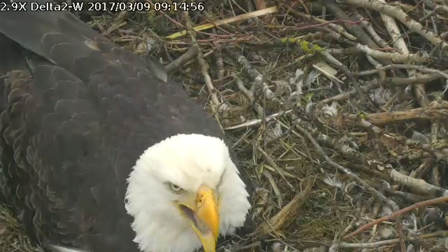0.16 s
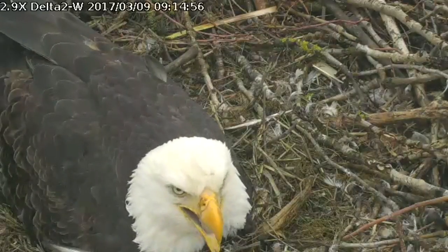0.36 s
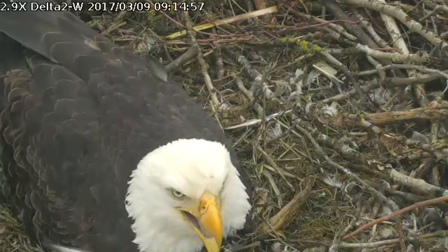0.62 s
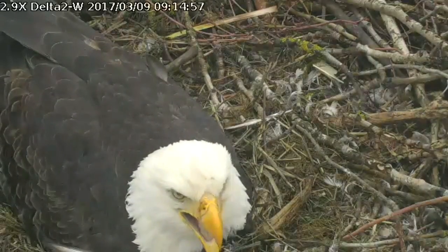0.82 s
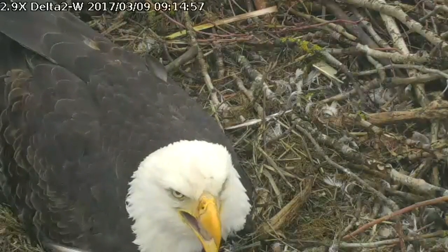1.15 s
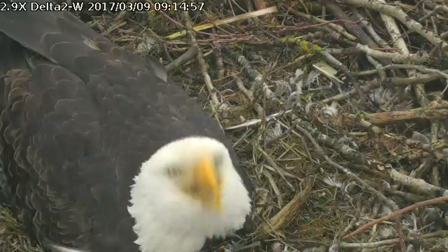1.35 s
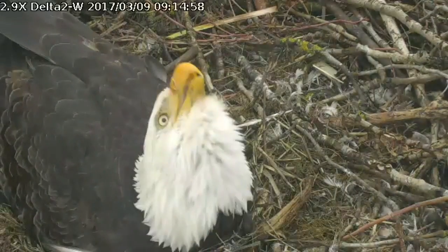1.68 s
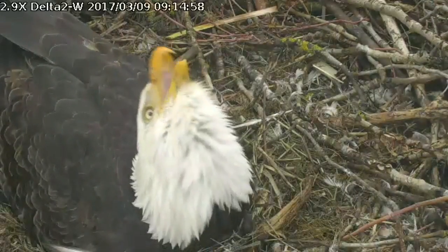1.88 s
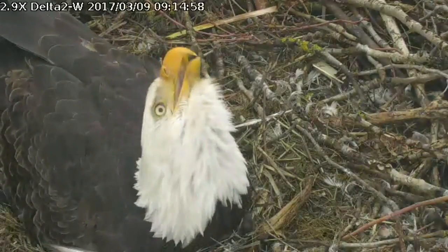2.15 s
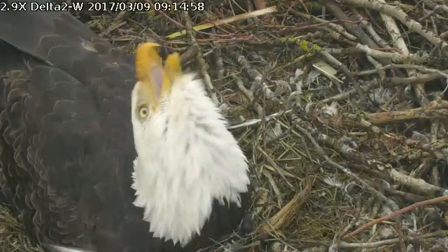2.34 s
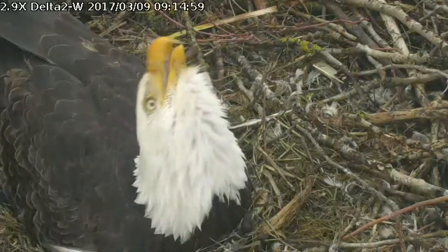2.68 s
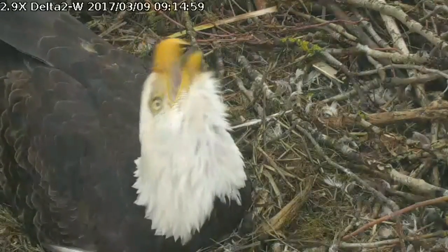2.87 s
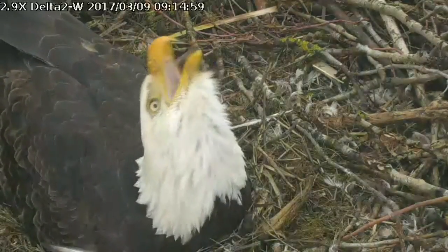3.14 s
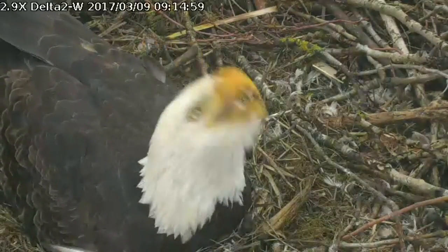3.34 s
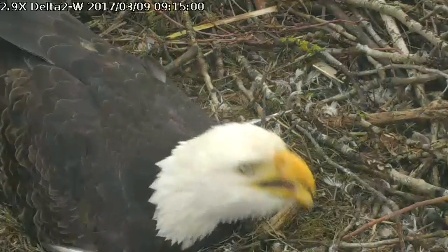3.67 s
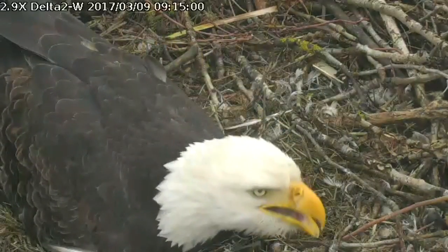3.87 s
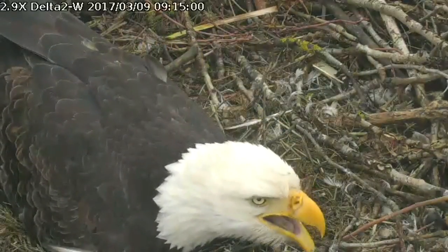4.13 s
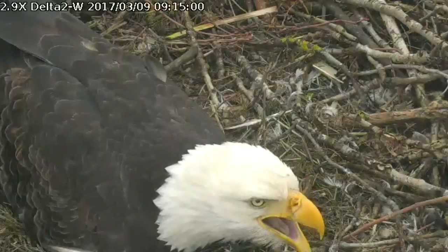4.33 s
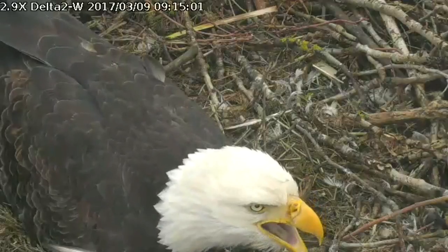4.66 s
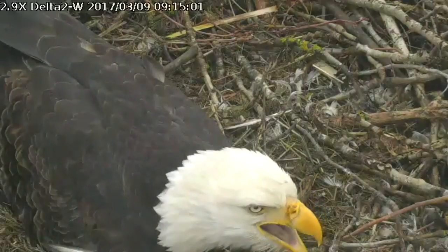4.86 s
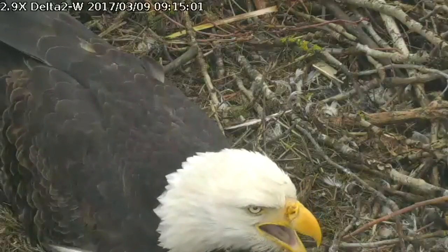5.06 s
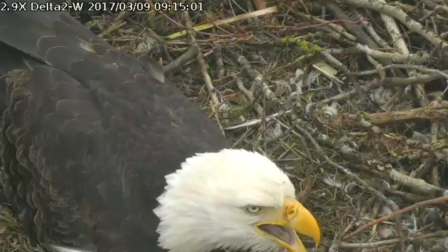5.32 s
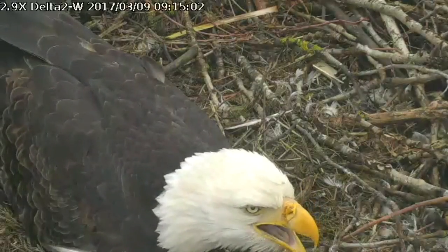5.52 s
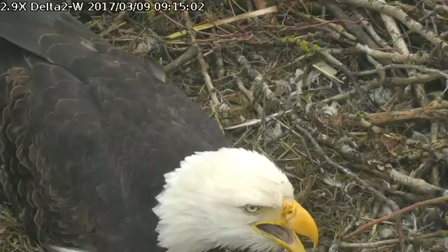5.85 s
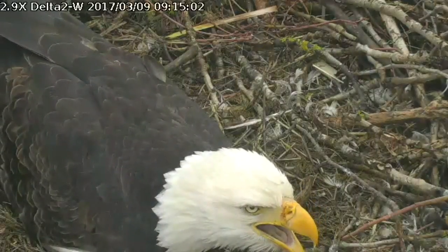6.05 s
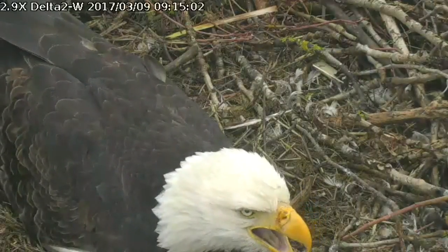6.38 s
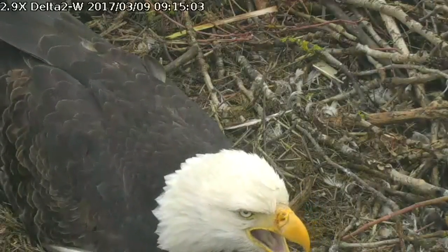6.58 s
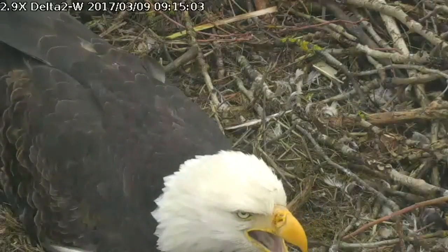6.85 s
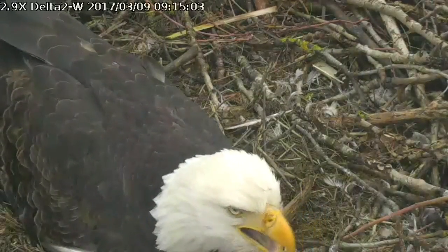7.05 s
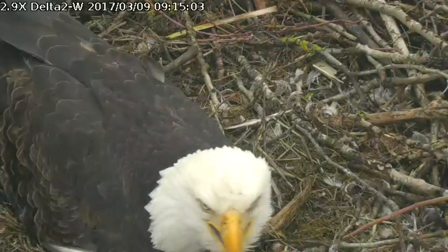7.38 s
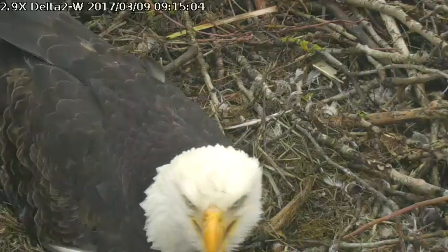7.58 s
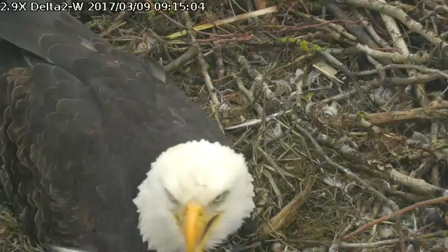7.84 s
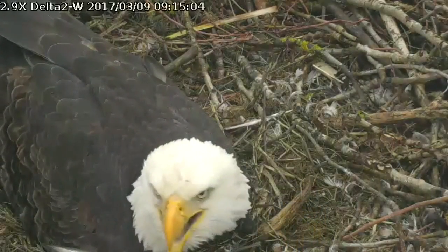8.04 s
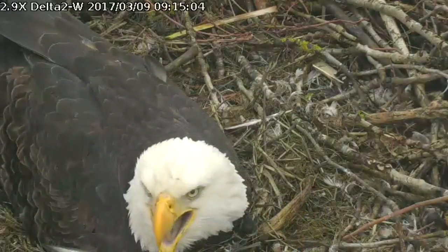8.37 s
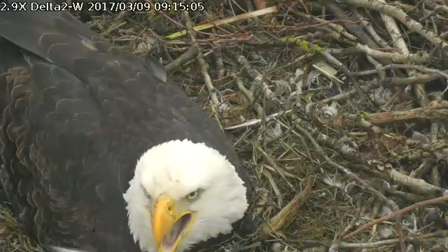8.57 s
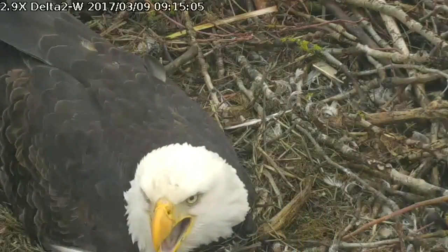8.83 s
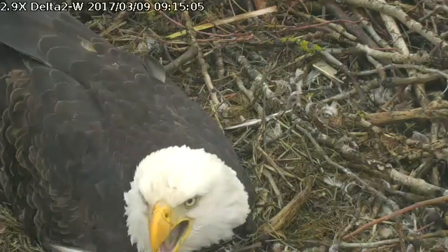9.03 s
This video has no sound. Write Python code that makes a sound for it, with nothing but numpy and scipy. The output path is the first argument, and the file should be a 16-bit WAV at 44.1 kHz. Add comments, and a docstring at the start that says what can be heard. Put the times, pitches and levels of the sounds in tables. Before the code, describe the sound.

Close to the nest microphone, a bald eagle gives five thin, high squeals, evenly spaced, each breaking into a hoarse, creaking rasp. A quick run of sharp chirps follows, with soft, dull bumps in the nest. After a pause comes a quieter run, and after another the loudest one. A steady low electrical hum, outdoor hiss and a faint distant drone lie underneath throughout.

```python
"""A mains hum on a nest camera's microphone line sits over outdoor hiss and a far drone.
Close by, a bald eagle gives five thin, arching squeals; each breaks into a rasp and a hoarse,
creaking note with a short cry and a few snaps. Three runs of sharp chirps follow, the first with
soft bumps in the nest; croaks lead into some calls. A chirp is a fall in which two voices beat,
then two clean whistles, high and low, from the two sides of the syrinx."""
import sys
import numpy as np
from scipy import signal
from scipy.fft import rfft, irfft, next_fast_len
from scipy.io import wavfile

SR = 44100
rng = np.random.default_rng(int(sys.argv[2]) if len(sys.argv) > 2 else 0)


def store_pcm(level_fs):
    """Save levels as 16-bit WAV."""
    pcm = np.round(np.clip(level_fs, -1, 1) * 32767).astype(np.int16)
    wavfile.write(sys.argv[1], SR, np.atleast_2d(pcm).T)


N = 406155
SIZE = next_fast_len(N, real=True)
TIME, BINS = np.arange(N) / SR, np.fft.rfftfreq(SIZE, 1 / SR)
MAINS_HZ, TREBLE_EDGE_HZ = 60, 7000

# odd harmonics of the hum: harmonic_number, level_db
HUM_HARMONICS = [(1, -34), (3, -42.5), (5, -53), (7, -56.5), (9, -65), (11, -59.5), (13, -63.5),
                 (15, -64.5)]
# outdoor hiss as the microphone colours it: frequency_hz, relative_db
HISS_COLOUR = [(30, 10), (66, 9.5), (98, 0.5), (128, -5.5), (200, -1.5), (350, -4), (560, -1.5),
               (740, -4.5), (1120, -2.5), (1850, -7.5), (2700, -9.5), (3080, -2.3), (3550, -13.3),
               (4300, -22.5), (7000, -35.5)]
# resonances of the far drone: centre_hz, width_hz, relative_db
DRONE_RESONANCES = [(600, 140, -8), (860, 75, -3)]
# the drone's slow fade: time_s, level_db
DRONE_FADE = [(0, -49), (3.5, -48), (4.6, -50), (9.2, -59.5)]
# squeals and their breaks: start_s, break_s, leap_hz, arch_height_hz, break_hz,
# leap_db, arch_db, break_db, rasp_db, cry_db, creak_db
SQUEAL_CUES = [(0.736, 0.799, 4640, 1136, 5970, -33, -38, -25.5, -28, -22.5, -30.5),
               (1.179, 1.247, 5650, 1320, 5750, -36, -43.5, -26.5, -29.5, -18.5, -31),
               (1.619, 1.653, 6020, 619, 5900, -33, -41, -28.5, -29, -41, -30),
               (2.028, 2.054, 6180, 604, 5850, -31, -42, -28.5, -29, -31.5, -36),
               (2.432, 2.482, 6245, 399, 6150, -33, -37.5, -26, -27.5, -22.5, -33)]
# resonances of the rasping throat: centre_hz, width_hz, relative_db
THROAT_RESONANCES = [(153, 110, 1.5), (1220, 600, -8), (2010, 180, -9), (3170, 620, -2.5), (4500, 500, -11),
                     (6700, 1600, -11)]
# snaps of the slack syrinx: centre_s, pitch_hz, level_db
SNAP_CUES = [(0.852, 1680, -33.5), (1.2882, 1900, -29.5), (1.302, 2330, -29), (1.3145, 1930, -33),
             (1.6947, 2400, -27.5), (1.710, 2700, -28), (2.096, 2260, -29), (2.109, 1920, -31.5),
             (2.524, 1980, -27.5), (2.54, 2160, -31.5)]
# croaks before a call: start_s, length_s, first_pulse_hz, last_pulse_hz, level_db, throat_tuning_ratio
CROAK_CUES = [(1.57, 0.067, 645, 685, -39.5, 0.89), (1.985, 0.032, 695, 720, -27.5, 0.94),
              (2, 0.033, 673, 730, -31, 0.94), (2.391, 0.04, 560, 696, -29, 0.93),
              (7.970, 0.04, 690, 723, -32.5, 1.08)]
# the throat during a croak: frequency_hz, relative_db
CROAK_THROAT = [(1400, -25), (2200, -12.5), (2850, -5), (3500, 5.5), (4300, -5.5), (5000, -29.5),
                (5800, -30)]
# bumps through the nest as the bird throws its head forward: peak_s, half_width_s, level_db
BUMP_CUES = [(3.676, 0.3, -31), (3.983, 0.038, -35)]
# slurs into a chirp: start_s, length_s, first_hz, top_hz, last_hz, full_level_db, roughness
SLUR_CUES = [(3.646, 0.0128, 3870, 5080, 4700, -21, 0.25), (8.0506, 0.016, 4060, 5330, 4200, -21, 0.2)]
# chirps: start_s, fall_s, from_hz, to_hz, fall_db, beat_hz, high_hz, high_db, high_half_length_s,
# low_hz, low_db, low_delay_s, low_fade_s, low_sag_hz_per_s, whistle_roughness
CHIRP_CUES = [(3.657, .0138, 4640, 3700, -23, 370, 4930, -18.5, 0.004, 3470, -22, .0095, 0.0087, 3000, 0.4),
              (3.781, 0.0125, 4450, 3900, -20, 480, 4780, -35, 0.014, 3850, -25, 0.0145, 0.011, 39500, 0.4),
              (3.9178, 0.0089, 3460, 3000, -23, 457, 4120, -49, 0.024, 2870, -31.5, 0.0081, 0.01, 11850, .45),
              (5.724, 0.0125, 3830, 3030, -23, 470, 4770, -37, 0.0092, 3090, -37, .006, 0.0062, 8050, 0.4),
              (5.846, 0.0095, 3900, 3165, -24, 570, 4670, -32, 0.011, 2890, -35.5, 0.009, 0.01, 4040, 0.46),
              (5.979, 0.0072, 3470, 2920, -24.5, 466, 4070, -42, 0.0084, 2930, -40.5, 0.0087, .008, 8000, 0.6),
              (8.063, 0.011, 4550, 3430, -19, 512, 5050, -13, 0.010, 3394, -14.5, 0.013, 0.007, 2630, 0.17),
              (8.177, 0.0098, 4630, 3340, -19.5, 480, 4990, -16.5, 0.008, 3358, -6.5, 0.013, 0.0089, 2660, 0.22),
              (8.3044, 0.01, 4360, 3300, -18.5, 523, 4690, -17, 0.0096, 3310, -18, 0.010, 0.005, 2520, 0.19),
              (8.443, 0.01, 3850, 3130, -22.5, 600, 4300, -26.5, 0.013, 2600, -30, 0.014, 0.0045, 5000, 0)]
# peeps, alone or beside a call: peak_s, half_length_s, pitch_hz, level_db, roughness
PEEP_CUES = [(2.399, .014, 4950, -41.5, 0.2), (3.696, .007, 3500, -31, 0.6), (5.720, .0055, 3810, -23, 0.2),
             (5.996, 0.0086, 4260, -40, 0.2), (6.114, .005, 3320, -46, .9), (6.131, 0.017, 3970, -38, 0.34),
             (8.1032, 0.011, 3326, -19.5, 0.3), (8.613, 0.013, 3850, -30.5, 0.42),
             (8.768, 0.011, 3714, -19.5, 0.07)]
# phase by which the left channel trails the right: frequency_hz, lag_rad
LEFT_LAG = [(60, 0.31), (300, 0.31), (800, 0.46), (1700, 0.72), (3350, 1.38), (4500, 1.77), (6900, 2.45)]


def amp(db):
    """Decibels to gain."""
    return 10 ** (np.asarray(db) / 20)


def unit(x):
    """Scales to rms 1."""
    return x / np.sqrt(np.mean(x ** 2) + 1e-20)


def over_hz(points):
    """Reads a table on a log-frequency axis at every bin."""
    hz, value = np.transpose(points)
    return np.interp(np.log(BINS + 1), np.log(hz + 1), value)


def peaks(modes):
    """Gain of a set of resonances at every bin."""
    return sum(amp(db) / (1 + 2 * ((BINS - hz) / width) ** 2) for hz, width, db in modes)


def noise(colour, grain=1):
    """Noise of rms 1, chopped by any grain, then filtered by colour."""
    return unit(irfft(rfft(grain * rng.standard_normal(N), SIZE) * colour, SIZE)[:N])


def wobble(size, rate_hz):
    """Smooth random motion of about unit size."""
    knots = rng.standard_normal(N // 20)
    return np.interp(np.arange(size) * rate_hz / SR, np.arange(len(knots)), knots)


def add(mix, start_s, sound):
    """Mixes a sound in at its cue."""
    part = mix[round(start_s * SR):][:len(sound)]
    part += sound[:len(part)]


def mains(buzz_db=-62, buzz_hz=3700, tilt=1.1, throb=0.67):
    """The line's wavering hum of odd harmonics, and a thin buzz that repeats every mains cycle."""
    hum = sum(np.sqrt(2) * amp(db) * np.cos(2 * np.pi * k * MAINS_HZ * TIME) for k, db in HUM_HARMONICS)
    size = SR // MAINS_HZ
    hz = np.fft.rfftfreq(size, 1 / SR)
    colour = np.minimum(hz / buzz_hz, (buzz_hz / (hz + 1)) ** tilt) * (hz < TREBLE_EDGE_HZ)
    cycle = irfft(colour * np.exp(2j * np.pi * rng.random(len(hz))), size)
    cycle *= 1 + throb * np.cos(2 * np.pi * 4 * np.arange(size) / size)
    return hum * (1 + 0.1 * wobble(N, rate_hz=22)) + amp(buzz_db) * unit(np.resize(cycle, N))


def outdoors(hiss_db=-40.5, rush_db=-49, rush_at_s=6.68, rush_s=0.57, rumble_db=-43.5, rumble_hz=11):
    """The bed: steady hiss, a distant rush that swells once, a deep rumble and a far drone."""
    hiss = amp(hiss_db + .3 * wobble(N, rate_hz=5)) * noise(amp(over_hz(HISS_COLOUR)))
    rush = amp(rush_db) * np.exp(-((TIME - rush_at_s) / rush_s) ** 2) * noise(peaks([(1250, 330, 0)]))
    rumble = amp(rumble_db) * noise(BINS / (1 + (BINS / rumble_hz) ** 2) ** 2)
    drone = amp(np.interp(TIME, *np.transpose(DRONE_FADE))) * noise(peaks(DRONE_RESONANCES))
    return hiss + drone + rush + rumble


def syrinx(hz, rough, jitter=0.074, shimmer=0.62, unrest_hz=1100, octave_db=-39):
    """The bird's voice: a nearly pure tone whose pitch and strength shake with roughness."""
    phase = 2 * np.pi * np.cumsum(hz * (1 + jitter * rough * wobble(len(hz), unrest_hz))) / SR
    strength = 1 + shimmer * rough * wobble(len(hz), unrest_hz)
    return np.sqrt(2) * strength * (np.sin(phase) + amp(octave_db) * np.sin(2 * phase))


def squeals(slack_hz=2940, leap_s=0.003, settle_s=0.004, swell_s=0.0032, ebb_s=0.0054, collapse_s=0.012):
    """The voice leaps from its slack pitch, arches in hoarse air, rings at the break and collapses."""
    out = np.zeros(N)
    for start_s, break_s, leap_hz, arch_hz, break_hz, leap_db, arch_db, break_db, *_ in SQUEAL_CUES:
        t = np.arange(start_s, break_s + collapse_s, 1 / SR)
        top_s = start_s + leap_s
        arch = np.sin(np.pi * np.clip((t - top_s) / (break_s - top_s), 0, 1) ** 1.3)
        collapse = np.clip((t - break_s) / collapse_s, 0, 1) ** 3
        glide = np.interp(t, [start_s, top_s, break_s], [slack_hz, leap_hz, break_hz])
        pitch = glide + arch_hz * arch + (slack_hz - break_hz) * collapse
        breaking = amp(break_db) * np.exp(-abs(t - break_s) / np.where(t < break_s, swell_s, ebb_s))
        level = amp(arch_db) + amp(leap_db) * np.exp(-((t - top_s) / settle_s - .5) ** 2) + breaking
        breath = np.sqrt(amp(arch_db) * level) * amp(1) * wobble(len(t), rate_hz=2500)
        air = breath * syrinx(pitch, rough=1, jitter=.13, shimmer=.5)
        # the other side of the syrinx adds a weak low note
        under = amp(arch_db - 3) * syrinx(hz=3050 + 300 * arch, rough=.8)
        grunt = amp(-12) * breaking * syrinx(pitch / 4, rough=1)
        tone = level * syrinx(pitch, rough=.5)
        add(out, start_s, (tone + air + under + grunt) * signal.windows.tukey(len(t), .04))
    return out


def rasps(rise_s=0.0024, early_s=0.0041, t60_s=0.27, halo_s=0.086, grain_db=2):
    """Grainy air in the throat: faint under the squeal, bursting out as it breaks."""
    level = np.zeros(N)
    for _, break_s, *_, arch_db, _, rasp_db, _, _ in SQUEAL_CUES:
        age = TIME - break_s + early_s
        burst = np.clip(age / rise_s, 0, 1) * np.exp(-np.log(1000) * np.maximum(age, 0) / t60_s)
        halo = np.exp(-(age / halo_s) ** 2)
        level += amp(rasp_db) * burst + amp(arch_db - 4) * halo
    grain = amp(grain_db * np.tanh(wobble(N, rate_hz=450)))
    return level * noise(peaks(THROAT_RESONANCES), grain)


def creaks(creak_hz=3130, pulse_hz=155, attack_s=0.003, hold_s=0.073,
           lift_hz=450, lift_at_s=.019, lift_s=0.0043, cry_at_s=0.0235, cry_s=0.0045):
    """After the break the slack syrinx stutters on a hoarse note, lifts into a cry and ends in snaps."""
    out = np.zeros(N)
    t = np.arange(0, 2 * hold_s, 1 / SR)
    for _, break_s, *_, cry_db, creak_db in SQUEAL_CUES:
        wander_hz = 130 * wobble(len(t), rate_hz=260)
        pitch = creak_hz + lift_hz * np.exp(-((t - lift_at_s) / lift_s) ** 2) + wander_hz
        pulses = np.cumsum(pulse_hz * (1 + .22 * wobble(len(t), pulse_hz))) / SR
        stutter = unit(np.sin(np.pi * pulses) ** 4 * amp(2 * wobble(len(t), pulse_hz)))
        hold = amp(creak_db) * stutter * np.minimum(t / attack_s, 1) * np.exp(-(t / hold_s) ** 6)
        cry = amp(cry_db) * np.exp(-((t - cry_at_s) / cry_s) ** 2)
        tone = syrinx(pitch, rough=1, jitter=.065, shimmer=.35, unrest_hz=1300, octave_db=-19)
        add(out, break_s, np.hypot(hold, cry) * unit(tone))
    for cue in SNAP_CUES:
        add(out, *snap(*cue))
    return out


def snap(centre_s, hz, db, length_s=0.0021, sweep_octaves=0.99):
    """One snap of the slack syrinx: a tiny, rough upward sweep."""
    u = np.linspace(-.5, .5, round(length_s * SR))
    sweep = syrinx(hz * 2 ** (sweep_octaves * u), rough=0.94, jitter=.14)
    return centre_s - length_s / 2, amp(db) * unit(np.cos(np.pi * u) ** 2 * sweep)


def branches(calls, wet_db=-27, t60_s=0.11):
    """Faint scatter from the sticks and limbs round the nest."""
    t = np.arange(SR // 2) / SR
    tail = rng.standard_normal(len(t)) * np.exp(-np.log(1000) * t / t60_s)
    return amp(wet_db) * signal.fftconvolve(calls, tail / np.linalg.norm(tail))[:N]


def croaks(unrest_hz=500, jitter=.045, shimmer=0.2):
    """Soft, buzzy notes: slow pulses of the syrinx, of which the throat passes a few overtones."""
    out = np.zeros(N)
    for start_s, length_s, first_hz, last_hz, db, tuning in CROAK_CUES:
        u = np.linspace(0, 1, round(length_s * SR))
        hz = (first_hz + (last_hz - first_hz) * np.sqrt(u)) * (1 + jitter * wobble(len(u), unrest_hz))
        phase = 2 * np.pi * np.cumsum(hz) / SR
        tone = np.zeros(len(u))
        for k in range(2, 9):
            throat = amp(np.interp(k * hz / tuning, *np.transpose(CROAK_THROAT)))
            flicker = 1 + shimmer * wobble(len(u), unrest_hz)
            tone += throat * flicker * np.sin(k * phase + 2 * np.pi * rng.random())
        add(out, start_s, amp(db) * unit(tone) * np.sin(np.pi * u ** 0.66) ** 2)
    return out


def bumps(thud_hz=30, rustle_db=-18, rustle_hz=2200):
    """The bird's shifting weight thuds dully in the nest, with a faint rustle of feathers."""
    level = sum(amp(db) * np.exp(-((TIME - peak_s) / width_s) ** 2) for peak_s, width_s, db in BUMP_CUES)
    thud = noise(BINS ** 2 / (1 + (BINS / thud_hz) ** 2) ** 2.5)
    rustle = amp(rustle_db) * noise(peaks([(rustle_hz, 900, 0)]))
    return level * (thud + rustle)


def slur(start_s, length_s, first_hz, top_hz, last_hz, db, rough, top_at=0.56, swell_db=11):
    """A swelling note that climbs to its top pitch and turns down into the chirp."""
    u = np.linspace(0, 1, round(length_s * SR))
    climb = np.sin(np.pi / 2 * np.interp(u, [0, top_at], [0, 1]))
    drop = np.sin(np.pi / 2 * np.interp(u, [top_at, 1], [0, 1])) ** 2
    hz = first_hz + (top_hz - first_hz) * climb + (last_hz - top_hz) * drop
    level = amp(db + swell_db * (u ** 2 - 1)) * signal.windows.tukey(len(u), .25)
    return start_s, level * syrinx(hz, rough)


def fall(start_s, length_s, first_hz, last_hz, db, beat_hz, rough):
    """Both sides of the syrinx drop together, slightly detuned, beating in a fast flutter."""
    hz = first_hz + (last_hz - first_hz) * np.linspace(0, 1, round(length_s * SR)) ** 1.6
    tone = syrinx(hz + beat_hz / 4, rough) - .65 * syrinx(hz - 3 * beat_hz / 4, rough)
    grit = 1 + .6 * rough * wobble(len(hz), rate_hz=2400)
    return start_s, amp(db) * unit(tone * grit) * signal.windows.tukey(len(hz), .4)


def whistle(peak_s, half_length_s, hz, db, rough, sag=0.011):
    """A note that swells and fades evenly as its pitch slips; a negative sag lifts it."""
    u = np.linspace(-1, 1, round(2 * half_length_s * SR))
    return peak_s - half_length_s, amp(db) * np.exp(-5.5 * u ** 2) * syrinx(hz * (1 - sag * u), rough)


def low_whistle(fall_end_s, hz, db, delay_s, fade_s, sag_hz_per_s, rough):
    """A note grows out of the fall, then sags, wavers and fades until the syrinx shuts."""
    t = np.arange(-1.5 * delay_s, 3 * fade_s, 1 / SR)  # zero at the peak
    swell = np.exp(-np.where(t < 0, abs(t / (0.62 * delay_s)) ** 1.4, abs(t / fade_s) ** 0.94))
    shut = np.exp(-(np.maximum(t, 0) / (2.1 * fade_s)) ** 8)
    waver_db = 2 * np.clip(t / fade_s, 0, 1) * wobble(len(t), rate_hz=220)
    tone = syrinx(hz - sag_hz_per_s * t, rough)
    return fall_end_s + delay_s + t[0], amp(db + waver_db) * swell * shut * tone


def chirps(catch_s=0.0042):
    """The voice catches with a tick, falls and splits into two whistles, among slurs and peeps."""
    out = np.zeros(N)
    for cue in CHIRP_CUES:
        start_s, fall_s, from_hz, to_hz, db, beat_hz, high_hz, high_db, high_s, *low_note, rough = cue
        end_s = start_s + fall_s
        catch_at_s = start_s - catch_s / 2
        add(out, *fall(catch_at_s, catch_s, 1.15 * from_hz, from_hz, db - 16, beat_hz, rough=0.47))
        add(out, *snap(start_s, hz=2500, db=db - 25))
        add(out, *fall(start_s, fall_s, from_hz, to_hz, db, beat_hz, rough=.22))
        add(out, *whistle(end_s + 0.51 * high_s, high_s, high_hz, high_db, rough, sag=-.02))
        add(out, *low_whistle(end_s, *low_note, rough))
    for cue in SLUR_CUES:
        add(out, *slur(*cue))
    for cue in PEEP_CUES:
        add(out, *whistle(*cue))
    return out


def with_breath(voice, air_db=-19, air_hz=3900, smooth_s=0.047):
    """Adds a puff of air that follows the loudness of the voice."""
    window = signal.windows.hann(round(smooth_s * SR)) * 2 / (smooth_s * SR)
    pressure = signal.fftconvolve(abs(voice), window, "same")
    return voice + amp(air_db) * pressure * noise(peaks([(air_hz, 800, 0)]))


def scene(side_db=-14):
    """All reaches one microphone; its two channels differ in phase and by a trace of the outdoor bed."""
    eagle = squeals() + rasps() + creaks() + with_breath(croaks() + chirps())
    mid = eagle + branches(eagle) + bumps() + mains() + outdoors()
    side = amp(side_db) * outdoors()
    left = irfft(rfft(mid + side, SIZE) * np.exp(-1j * over_hz(LEFT_LAG)), SIZE)[:N]
    return np.array([left, mid - side])


def record(dry):
    """The camera's narrow band cuts off the top end."""
    lowpass = signal.firwin(401, TREBLE_EDGE_HZ, window=("kaiser", 8), fs=SR)
    return signal.oaconvolve(dry, lowpass[None], "same")


dry = scene()
out = record(dry)
store_pcm(out)
```